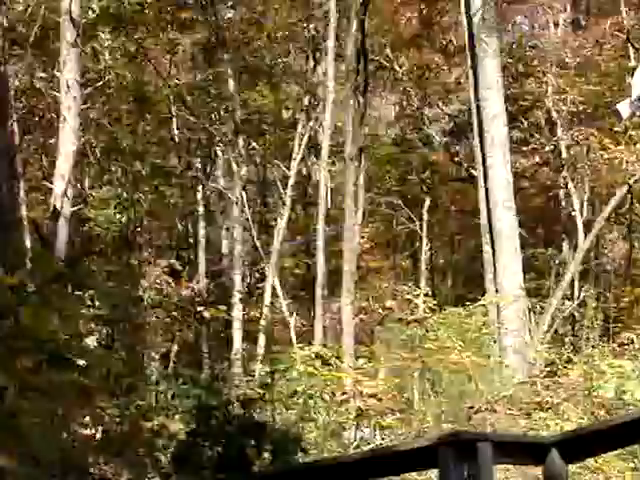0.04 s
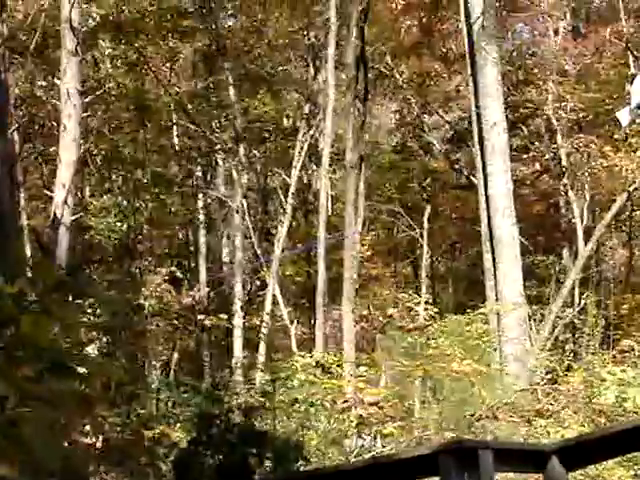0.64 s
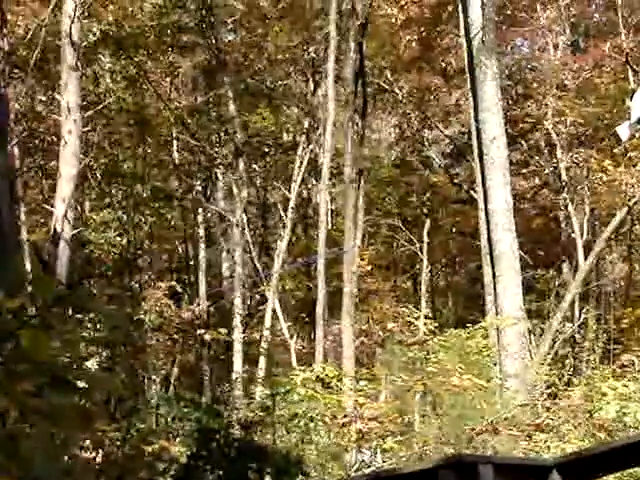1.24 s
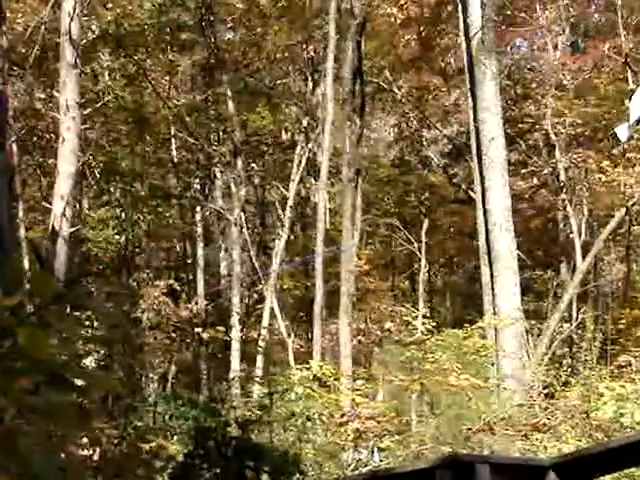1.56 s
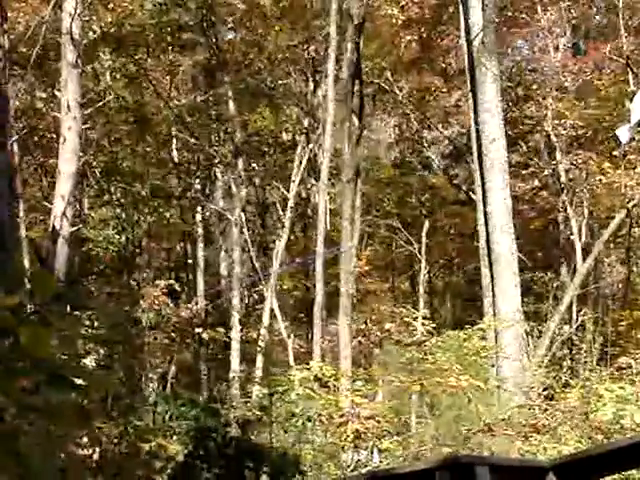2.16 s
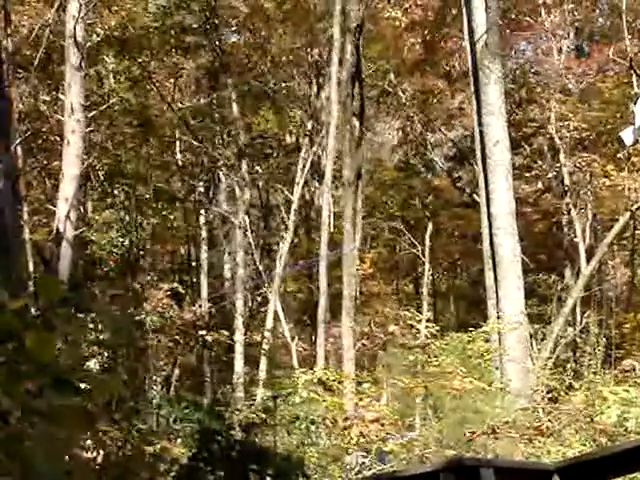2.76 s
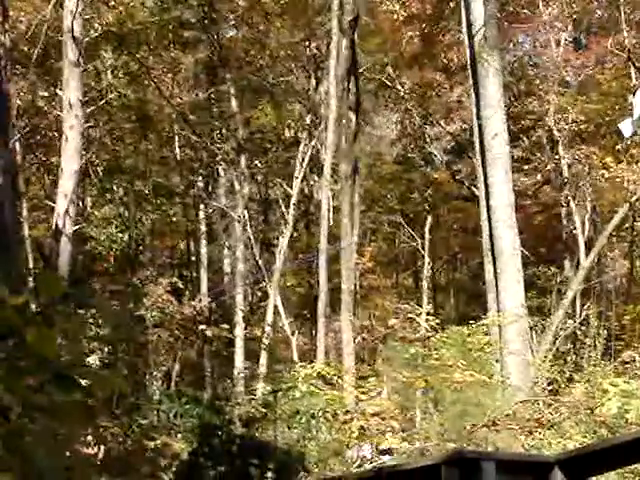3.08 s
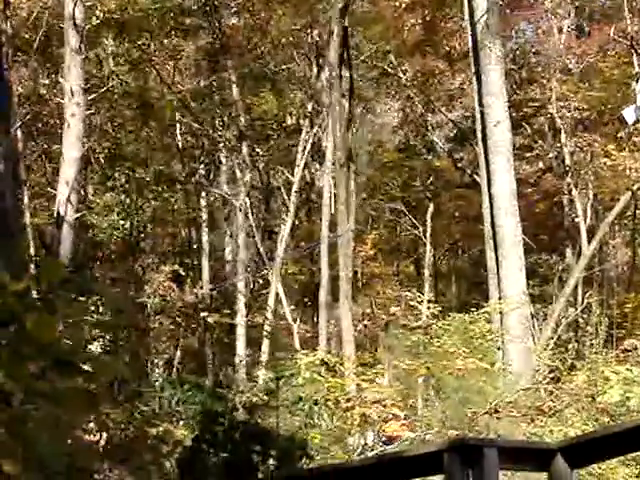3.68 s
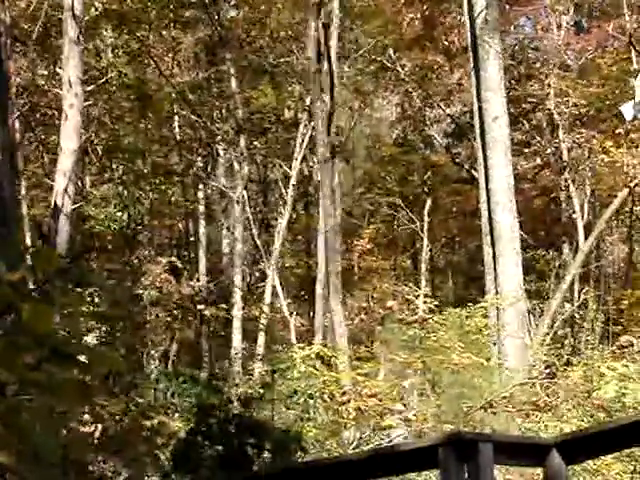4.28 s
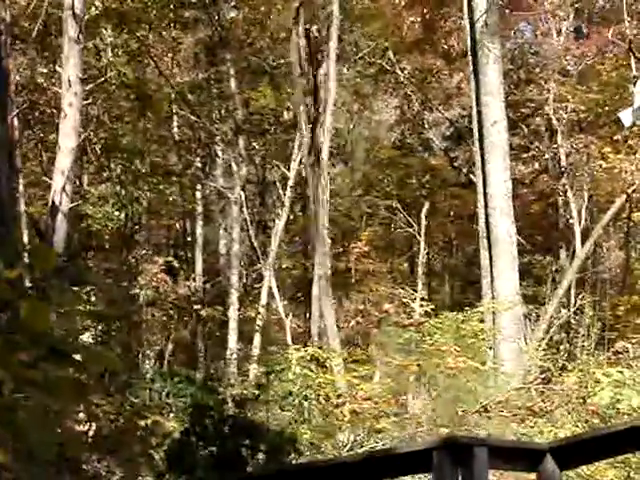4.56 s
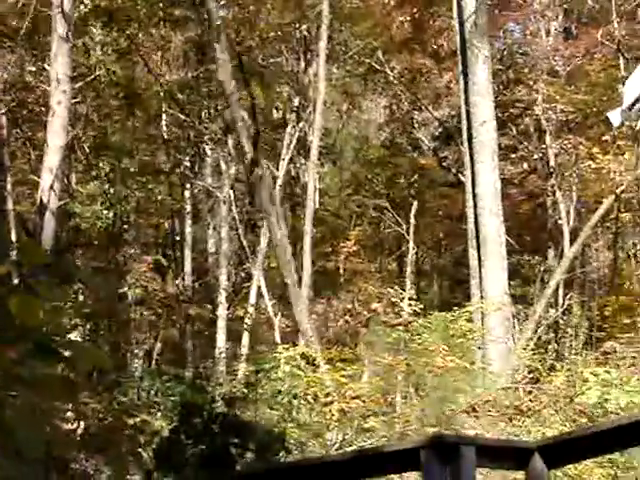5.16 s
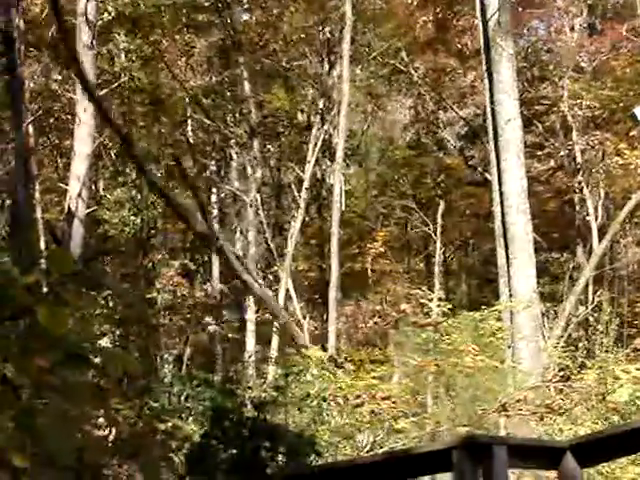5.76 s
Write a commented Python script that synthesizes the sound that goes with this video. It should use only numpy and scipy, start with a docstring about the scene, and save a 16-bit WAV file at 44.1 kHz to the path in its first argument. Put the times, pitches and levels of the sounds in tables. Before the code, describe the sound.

A two-stroke chainsaw cuts a trunk at full throttle with a steady, high buzzing drone. After about two seconds it is released and winds down with a falling whine and chain rattle, settling into an uneven, puttering idle. Then the tree tips: wood ticks, cracks sharply and splinters while leaves rustle softly. The sounds carry across open woodland with a short echo over a faint low rumble.

```python
"""Chainsaw felling a tree.

A two-stroke saw runs flat out, is released, coasts and putters at idle. One crank times its exhaust
pulses, chain slap, fan whine and clutch strikes. The tree tips: hinge fibres tick, crack and splinter
while the crown brushes through leaves. Trunks scatter the sound over a low rumble of open air."""
import sys
import numpy as np
from scipy import signal
from scipy.fft import rfft, irfft, next_fast_len
from scipy.io import wavfile
from scipy.ndimage import map_coordinates

SR = 44100
rng = np.random.default_rng(int(sys.argv[2]) if len(sys.argv) > 2 else 0)


def dump_mix(stems):
    """Bounce the given channels to the path in sys.argv[1] as a 16-bit WAV at rate SR."""
    frames = np.atleast_2d(stems).T  # one column per channel
    limited = np.clip(frames, -1, 1)  # hard clip at full scale
    pcm = np.round(limited * 32767).astype(np.int16)
    wavfile.write(sys.argv[1], SR, pcm)


N = 257103
RELEASE_S = 2.205  # throttle shuts


def amp(db):
    return 10 ** (np.asarray(db) / 20)


def unit_rms(x):
    return x / np.sqrt(np.mean(x ** 2) + 1e-20)


def clock():
    return np.arange(N) / SR


def since(start_s):
    return np.maximum(clock() - start_s, 0)


def ramp(centre_s, length_s):
    return np.clip((clock() - centre_s) / length_s + .5, 0, 1)


def at_freq(points, hz):
    freqs, values = np.transpose(points)
    return np.interp(np.log(hz + 1), np.log(freqs + 1), values)


def curves(rows):
    """Per-sample curve of each column after time_s."""
    time_s, *columns = np.transpose(rows)
    return [np.interp(clock(), time_s, column) for column in columns]


def wobble(rate_hz):
    """Smooth random curve."""
    knots = rng.standard_normal(int(N * rate_hz / SR) + 4)
    return map_coordinates(knots, [np.arange(N) * rate_hz / SR])


def colour(x, spectrum):
    """Minimum-phase filter from freq_hz, gain_db points."""
    m = 2 * next_fast_len(len(x) // 2 + 4096)
    cepstrum = irfft(np.log(amp(at_freq(spectrum, np.fft.rfftfreq(m, 1 / SR)))))
    cepstrum[1:m // 2] *= 2
    cepstrum[m // 2 + 1:] = 0
    return irfft(rfft(x, m) * np.exp(rfft(cepstrum)))[:len(x)]


def resonate(x, modes):
    """Parallel band-pass resonances."""
    m = 2 * next_fast_len(N)
    f = np.fft.rfftfreq(m, 1 / SR)
    response = sum(amp(db) * 1j * f * width / (hz * hz - f * f + 1j * f * width)
                   for hz, width, db in modes)
    return irfft(rfft(x, m) * response)[:N]


def pulses(turns, spread_db, jitter_s):
    """One impulse per turn, uneven in size and time."""
    starts = np.flatnonzero(np.diff(np.floor(turns)) > 0)
    size, late = rng.standard_normal((len(starts), 2)).T
    starts += np.round(late * jitter_s * SR).astype(int)
    return np.bincount(np.clip(starts, 0, N - 1), amp(spread_db * size), N)


def bursts(turns, depth_db):
    """Noise that flares each turn, then decays by depth_db."""
    return unit_rms(amp(-depth_db * (turns % 1))) * rng.standard_normal(N)


# Open-air rumble: freq_hz, gain_db
AIR_SPECTRUM = [(20, -15), (50, 3), (120, -10.5), (300, 5.5), (1000, -29.5), (10000, -41.5)]


def air(throttle, level_db=-71, swell_db=5.5, blast_db=8, stir_db=11):
    """Low rumble, stirred by the exhaust blast and the falling crown."""
    level = level_db + swell_db * wobble(21) + blast_db * throttle + stir_db * ramp(3.85, 1.4)
    return amp(level) * unit_rms(colour(rng.standard_normal(N), AIR_SPECTRUM))


# Forest decay before t60_scale: freq_hz, t60_s
FOREST_DECAY = [(100, 0.17), (600, 1), (3000, 1), (10000, 0.21)]


def forest_reverb(x, t60_scale=0.99):
    """Diffuse echo off the trunks; the mids ring longest."""
    hz, t, noise = signal.stft(rng.standard_normal(SR), SR, nperseg=256)
    t60_s = t60_scale * at_freq(FOREST_DECAY, hz)[:, None]
    tail = signal.istft(noise * amp(-60 * t / t60_s), SR, nperseg=256)[1]
    return signal.fftconvolve(x, tail / np.linalg.norm(tail))[:len(x)]


def trunk_scatter(x, spread_s=0.00496, spacing_hz=230):
    """Paths between trunks delay each band differently, softening pulses."""
    m = 2 * next_fast_len(N)
    delay_s = spread_s * np.sin(np.pi * np.fft.rfftfreq(m, 1 / SR) / spacing_hz) ** 2
    return irfft(rfft(x, m) * np.exp(-2j * np.pi * np.cumsum(delay_s) * SR / m))[:N]


# Leaf rustle: freq_hz, gain_db
LEAF_SPECTRUM = [(150, -24), (400, 8), (800, 10.5), (1500, 8), (2600, -3), (3500, -24), (5500, 1),
                 (8000, -11.5), (10000, -59)]
# Rustle envelope: time_s, relative_db
CROWN_ENVELOPE = [(4.0, -46), (4.25, -41), (4.6, -39.5), (4.9, -42.5), (5.2, -41), (5.45, -40.5),
                  (5.83, -40.5)]


def crown(gain_db=-3, grain_db=2):
    """Leaves and twigs brush their neighbours in small clumps."""
    grains = rng.standard_normal(N) * amp(grain_db * wobble(700) + 1.8 * wobble(35))
    rustle = unit_rms(colour(grains, LEAF_SPECTRUM))
    return rustle * amp(curves(CROWN_ENVELOPE)[0] + gain_db) * ramp(4.14, 0.43)


# Loud hinge breaks: start_s, relative_db, ring_hz
BREAKS = [(4.128, -26.5, 3000), (4.23, -25, 2740), (4.351, -27.5, 2410), (4.369, -28, 2600),
          (4.716, -15.5, 2160), (4.718, -10.5, 2340), (4.8437, -10, 2300), (4.984, -24, 2390),
          (5.3813, -21.5, 2480), (5.4835, -16, 4130), (5.574, -19.5, 2620), (5.5819, -12, 3300),
          (5.5859, -12, 3350), (5.5951, -16.5, 2610), (5.598, -16, 3070)]


def fibre_events(tick_db=-34, spread_db=3, ring_hz=2900, count=14):
    """Loud breaks, plus faint single-fibre ticks at random between them."""
    when, size, pitch = rng.random((count, 3)).T
    first_s, last_s = BREAKS[0][0], BREAKS[-1][0]
    ticks = zip(first_s + when * (last_s - first_s),
                tick_db + spread_db * (2 * size - 1),
                ring_hz * 2 ** (pitch - .5))
    return [*BREAKS, *ticks]


# Fibre snap: ring_ratio, gain_db
SNAP_SPECTRUM = [(.05, -15), (.2, -11.5), (.6, -7.5), (.85, -1.5), (1, 2.5), (1.202, -2), (1.7, -12),
                 (2.4, -4.5), (3.3, -6)]
# Treble loss in the forest: freq_hz, gain_db
FOREST_DAMPING = [(5500, 4), (8000, -15), (10000, -17)]
# Snap echo: freq_hz, gain_db
ECHO_SPECTRUM = [(100, -28.5), (450, 2.5), (1200, 0), (2800, -0.5), (4500, 0), (7000, -10), (10000, -20)]


def cracks(gain_db=-5, snap_t60_s=0.016, splinter_db=-26, splinter_t60_s=0.078, echo_db=-4):
    """Fibres part with a snap and a spray of splinters; the forest echoes."""
    out, t = np.zeros(N + SR), np.arange(SR) / SR
    envelope = amp(-60 * t / snap_t60_s) + amp(splinter_db - 60 * t / splinter_t60_s)
    for start_s, relative_db, ring_hz in fibre_events():
        spectrum = [(ratio * ring_hz, db + at_freq(FOREST_DAMPING, ratio * ring_hz))
                    for ratio, db in SNAP_SPECTRUM]
        snap = colour(envelope * rng.standard_normal(SR), spectrum)
        echo = forest_reverb(colour(signal.unit_impulse(SR), ECHO_SPECTRUM))
        crack = snap / np.linalg.norm(snap) + amp(echo_db) * echo / np.linalg.norm(echo)
        out[round(start_s * SR):][:SR] += amp(relative_db + gain_db) * np.sqrt(.002 * SR) * crack
    return out[:N]


# Speed in the cut: time_s, crank_hz
CUT_SPEED = [(0.1, 194.6), (0.2, 196.8), (0.39, 195.3), (0.47, 195.9), (0.56, 195.6), (0.76, 197.2),
             (0.88, 197.2), (1.0, 198.3), (1.22, 198.6), (1.4, 196.5), (1.5, 198), (1.79, 196.4),
             (1.93, 198.9), (2.03, 197.1), (2.11, 197.1), (2.19, 200.6)]
# Hunting idle: time_s, crank_hz, exhaust_db
IDLE_TRACK = [(4.05, 44.13, -37.3), (4.25, 48, -36), (4.55, 51.05, -34), (4.8, 48.72, -35.5),
              (5.3, 48.02, -36.5), (5.83, 49, -40.5)]


def crank_speed(drop_share=.093, drop_s=.108, coast_s=.897):
    """Friction slows the released engine until the idle catches it."""
    t = since(RELEASE_S)
    run_down = drop_share * np.exp(-t / drop_s) + (1 - drop_share) * np.exp(-t / coast_s)
    coast_hz = curves(CUT_SPEED)[0] * run_down
    return (coast_hz ** 6 + curves(IDLE_TRACK)[0] ** 6) ** (1 / 6)  # soft maximum


def octaves(crank_hz):
    """Octaves relative to full speed."""
    return np.log2(crank_hz / CUT_SPEED[-1][1])


def bite_db(extra_db=2, settle_s=0.47):
    """The saw starts loud and settles into the cut."""
    return extra_db * np.exp(-clock() / settle_s)


# Clutch drum: freq_hz, gain_db
DRUM_SPECTRUM = [(100, -54), (200, -53), (480, -20.5), (600, -5), (700, -0.5), (820, -7), (1100, -23),
                 (1500, -7), (2500, -47)]


def clutch(turns, level_db=-34.5, peak_s=3.11, swell_s=0.3):
    """Slowing shoes strike the drum once a turn, in one swell, as they let go."""
    strikes = pulses(turns + 0.2976, spread_db=3, jitter_s=.0005)
    swell = np.exp(-((clock() - peak_s) / swell_s) ** 2)
    return unit_rms(colour(strikes, DRUM_SPECTRUM)) * amp(level_db) * swell


# Fan throb: cycles_per_turn, relative_depth
FAN_THROB = [(1, 0.34), (2, 0.41), (3, .45), (4, .4)]


def fan(turns, crank_hz, throttle, cut_db=-26, emerge_s=.56, coast_db=-19, db_per_octave=9, vanes=22):
    """Flywheel vanes whine: emerging in the cut, then sinking through the saw's resonances."""
    throb = sum(depth * np.cos(2 * np.pi * k * turns + k * k) for k, depth in FAN_THROB)
    flutter = amp(2.4 * wobble(45)) * (1 + throb * (1 - .5 * throttle))
    tone = np.sin(2 * np.pi * vanes * turns + .55 * wobble(90))
    cutting = amp(cut_db - 38 * np.exp(-clock() / emerge_s))
    resonance_db = at_freq(RATTLE_SPECTRUM, vanes * crank_hz)
    coasting = amp(coast_db + db_per_octave * octaves(crank_hz) + resonance_db) * (1 - ramp(3.15, 0.55))
    return tone * flutter * (throttle * cutting + (1 - throttle) * coasting)


def chain_levels_db(crank_hz, rattle_db=-20, hiss_db=-29, clutch_open_s=3.13, stop_s=0.5):
    """Rattle and hiss fall with speed, and further as the freed chain stops."""
    stopped = 1 - np.exp(-since(clutch_open_s) / stop_s)
    return (rattle_db + bite_db() + 7.5 * octaves(crank_hz) - 6 * stopped,
            hiss_db + 5.5 * octaves(crank_hz) - 16 * stopped)


def chain_shake(turns, throttle):
    """Noise bursts: every other turn under power, every turn after release."""
    return throttle * bursts(turns / 2, depth_db=7) + (1 - throttle) * bursts(turns, depth_db=6)


def bar_rasp(turns, throttle, cut_db=-4, coast_db=-6, chirp_s=.008):
    """Bending waves in the bar arrive treble first, smearing each slap into a chirp."""
    cutting = amp(cut_db) * unit_rms(pulses(turns / 2, spread_db=1.5, jitter_s=.00005))
    coasting = amp(coast_db) * unit_rms(pulses(turns, spread_db=2.5, jitter_s=.00005))
    slaps = throttle * cutting + (1 - throttle) * (1 - ramp(2.69, 1.0)) * coasting
    t = np.arange(round(chirp_s * SR)) / SR
    chirp = signal.chirp(t, f0=7000, t1=t[-1], f1=300)
    return signal.fftconvolve(slaps, chirp / np.linalg.norm(chirp))[:N]


# Chain slap: freq_hz, gain_db
RATTLE_SPECTRUM = [(150, -50.5), (400, -16), (600, -6.5), (850, -9.5), (1400, -7.5), (1900, -4), (2400, 2),
                   (3000, -7), (3450, -3), (4000, -6), (4800, -29.5), (7000, -21), (10000, -39)]
# Running teeth: freq_hz, gain_db
HISS_SPECTRUM = [(2650, -25.5), (4500, -1), (4740, -6), (5290, -4.5), (8920, -17.5), (9620, -16.5),
                 (10200, -38.5), (13300, -30.5), (22000, -120)]
# Engine casing: freq_hz, width_hz, gain_db
CASING_MODES = [(1964.5, 160, -3.5), (2837, 200, 3), (3940, 200, -3), (4560, 160, -5), (5148, 180, -10.5)]


def chain(turns, crank_hz, throttle, cut_db=-4.5, knock_share=0.14):
    """Links slap the bar and teeth hiss; casing knock stands out as the chain stops."""
    rattle_db, hiss_db = chain_levels_db(crank_hz)
    rasp = bar_rasp(turns, throttle)
    shake = chain_shake(turns, throttle) * amp(1.9 * wobble(260))
    slaps = unit_rms(colour(shake + rasp, RATTLE_SPECTRUM))
    casing = resonate(bursts(turns, depth_db=1.5), CASING_MODES)
    knocks = unit_rms(colour(casing, FOREST_DAMPING))
    share = knock_share * (1 + ramp(3.3, .5) - throttle)
    metal = np.sqrt(1 - share) * slaps + np.sqrt(share) * knocks
    hiss_db += 0.52 * wobble(18)
    hiss = unit_rms(colour(chain_shake(turns, throttle), HISS_SPECTRUM))
    return amp(rattle_db + cut_db * throttle) * metal + amp(hiss_db) * hiss


# Muffler while coasting: freq_hz, gain_db
COAST_SPECTRUM = [(30, -34), (70, -19), (135, -8.5), (210, -17.5), (300, -5), (400, -2.5), (540, 4),
                  (680, 3), (900, -17.5), (1400, -5.5), (3000, -19.5), (9000, -51.5)]


def coast_exhaust(turns, crank_hz, level_db=-33.5, db_per_octave=3, return_turns=0.285, return_db=-8):
    """Throttle shut, each turn pumps one even puff and its return wave."""
    puffs = pulses(turns, spread_db=0.7, jitter_s=.00002)
    puffs += amp(return_db) * pulses(turns - return_turns, spread_db=0.2, jitter_s=.00002)
    muffled = unit_rms(colour(puffs / np.sqrt(crank_hz), COAST_SPECTRUM))
    last_fuel_db = 7 * np.exp(-since(RELEASE_S) / 0.065)
    return trunk_scatter(muffled) * amp(level_db + db_per_octave * octaves(crank_hz) + last_fuel_db)


# Muffler at idle: freq_hz, gain_db
IDLE_SPECTRUM = [(30, -40), (90, -21), (135, -8.5), (210, -15.5), (280, -7), (380, 0), (470, -1.5),
                 (540, 5), (600, -2), (700, -5), (900, -10), (1300, -13.5), (3000, -36.5), (9000, -62)]


def idle_exhaust(turns, intake_db=-7, gas_db=-11, limp_turns=.02):
    """Firings limp, the intake gulps between them, turbulent gas trails each puff."""
    firings = pulses(turns + limp_turns * np.cos(np.pi * turns), spread_db=1.5, jitter_s=.0003)
    gulps = amp(intake_db) * pulses(turns + .55, spread_db=2.5, jitter_s=.0009)
    gas = amp(gas_db) * bursts(turns, depth_db=2)
    burble = unit_rms(colour(unit_rms(firings + gulps) + gas, IDLE_SPECTRUM))
    return trunk_scatter(burble, spread_s=.004) * amp(curves(IDLE_TRACK)[1])


# Full-throttle exhaust partials: crank_order, relative_db
EXHAUST_ORDERS = [(0.5, -30), (1, -19.5), (1.5, -20.5), (2, 0.06), (2.5, -3), (3, 5), (3.5, -19), (4, -14),
                  (4.5, -9.5), (5, 2.5), (6, 4), (6.5, -12.5), (7, -12), (7.5, -34), (8, -8.5), (8.5, -3),
                  (9, -11.5), (9.5, -29.5), (10, -14), (10.5, -15), (11, -16), (11.5, -23), (12, 7.5),
                  (12.5, -7), (14, 1.5), (14.5, -2.5), (15, -23), (15.5, -18), (16.5, -18), (17, 3.5),
                  (17.5, -19), (18, 0.5), (18.5, 0.5), (19, -11)]


def full_exhaust(turns, level_db=-22, tilt_db=-3, flutter_db=0.99, blur_rad=0.96, lag_cycles=4.4):
    """Flat out, the engine fires every other turn, adding half orders to the note."""
    shaft_turns = turns + 0.0013 * wobble(70)
    note = np.zeros(N)
    for order, db in EXHAUST_ORDERS:
        # high orders leave the muffler later, flutter more and blur among the trunks
        height = order / EXHAUST_ORDERS[-1][0]
        gain = amp(db + tilt_db * height + flutter_db * (1 + height) * wobble(29.29))
        phase = 2 * np.pi * (order * shaft_turns - lag_cycles * height ** 2)
        note += gain * np.cos(phase + blur_rad * height * wobble(44.77))
    low_order_power = sum(amp(db) ** 2 / 2 for order, db in EXHAUST_ORDERS if order < 7)
    return amp(level_db + bite_db()) * note / np.sqrt(low_order_power)


def scene():
    """One crank drives the whole saw, hunting at idle while the tree tips."""
    throttle = 1 - ramp(RELEASE_S, 0.02)
    idling = ramp(3.27, 0.38)
    crank_hz = crank_speed() * (1 + .018 * idling * wobble(14))
    turns = np.cumsum(crank_hz) / SR
    saw = throttle * full_exhaust(turns)
    saw += amp(-20) * forest_reverb(saw, t60_scale=.6)
    saw += (1 - throttle) * np.sqrt(1 - idling) * coast_exhaust(turns, crank_hz)
    saw += (1 - throttle) * np.sqrt(idling) * idle_exhaust(turns)
    saw += trunk_scatter(clutch(turns))
    saw += chain(turns, crank_hz, throttle) + fan(turns, crank_hz, throttle)
    return np.tile(saw + cracks() + crown() + air(throttle), (2, 1))


def record(dry, onset_s=0.079, cutoff_hz=10250):
    """Abrupt onset, brick-wall low-pass."""
    m = 2 * next_fast_len(N)
    passband = np.fft.rfftfreq(m, 1 / SR) < cutoff_hz
    return irfft(rfft(dry * ramp(onset_s, 0.0025), m) * passband)[:, :N]


dry = scene()
out = record(dry)
dump_mix(out)
```